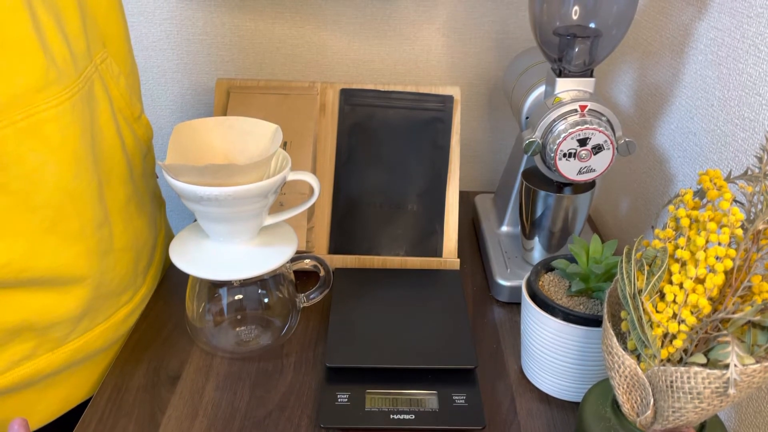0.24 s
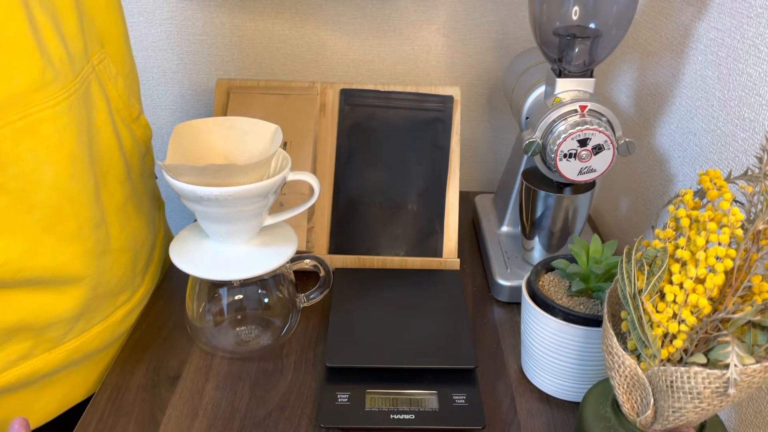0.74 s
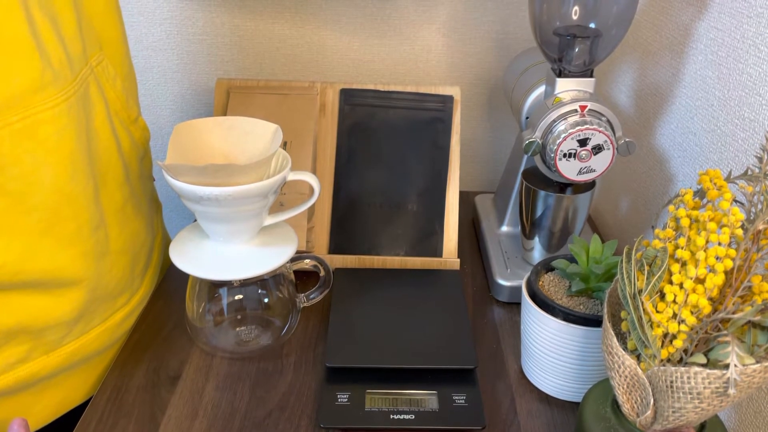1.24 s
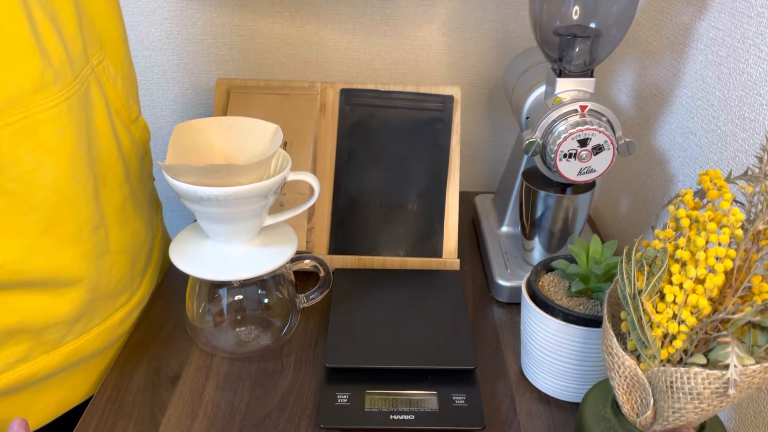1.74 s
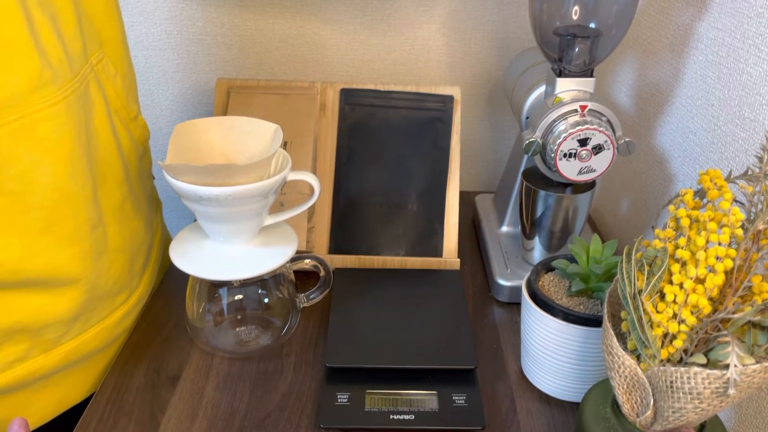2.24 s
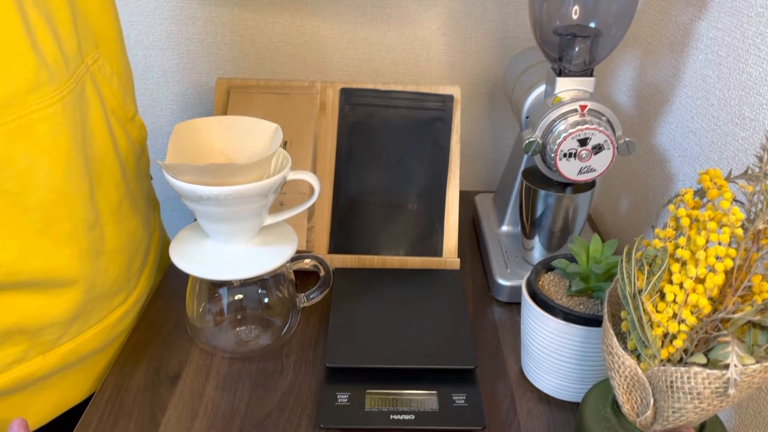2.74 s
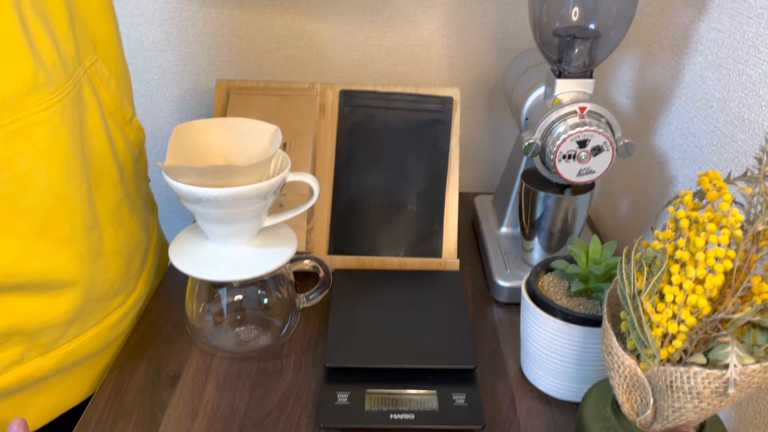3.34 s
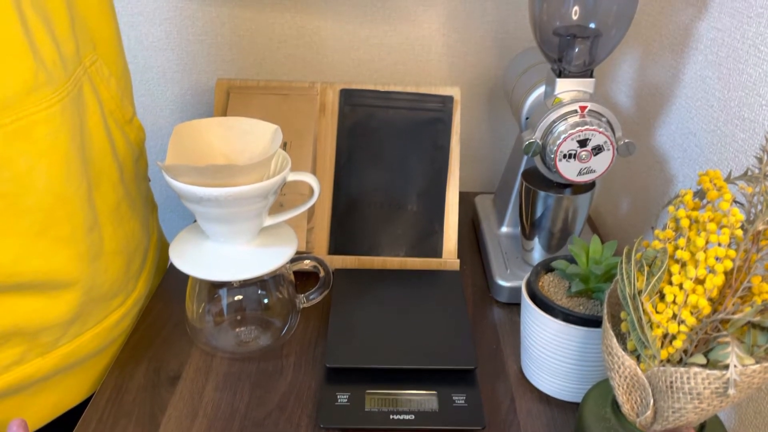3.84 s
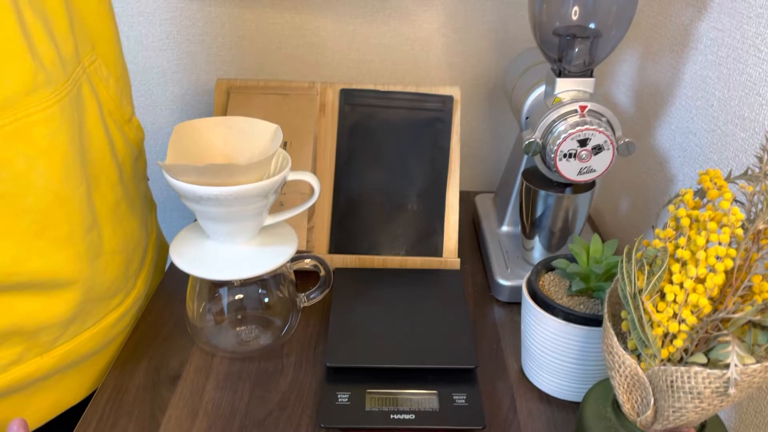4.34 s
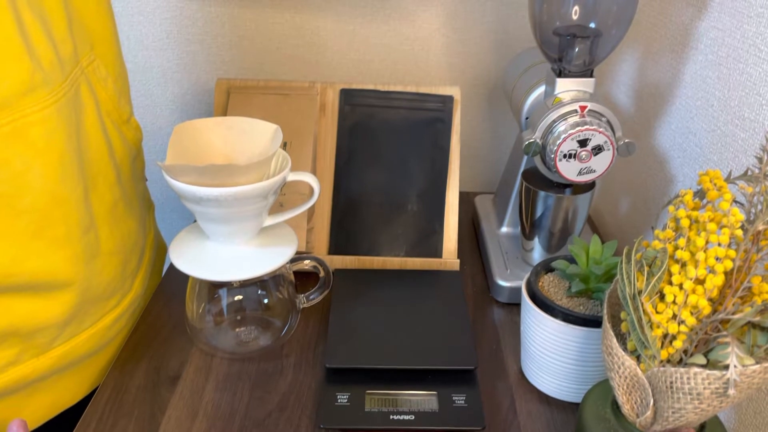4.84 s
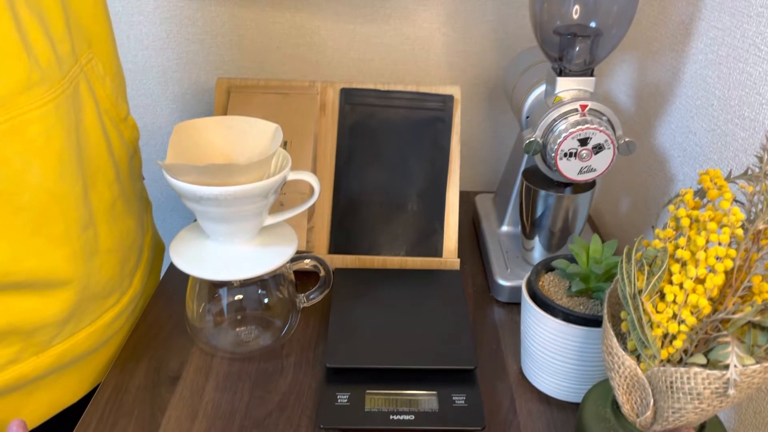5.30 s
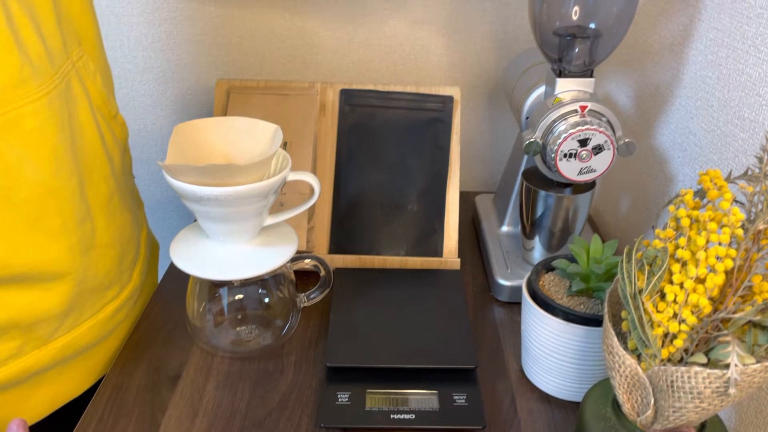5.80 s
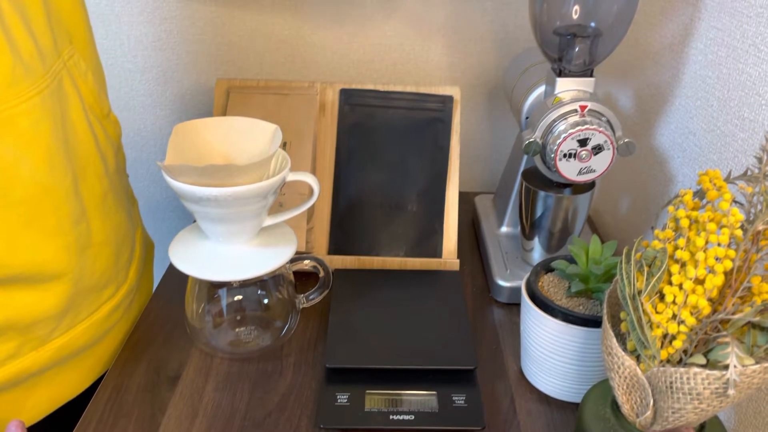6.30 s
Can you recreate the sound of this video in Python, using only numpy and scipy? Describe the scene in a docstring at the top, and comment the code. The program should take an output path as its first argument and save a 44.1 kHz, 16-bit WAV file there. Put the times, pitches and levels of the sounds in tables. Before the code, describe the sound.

An electric coffee grinder is already running on a wooden counter, heard close by. Beans crack and crunch in irregular clumps, rattling the housing and chute over a motor whine, low hum and airy hiss. The whine slowly climbs as the crunch thins, with a few soft thumps through the counter. For the last two seconds it runs nearly empty, with a steadier whine and a few stray cracks.

```python
"""An electric burr grinder on a wooden counter, already chewing through its last beans.
At first beans crack in clumps between the burrs, ringing the housing, chute and hopper and thumping
the counter, over motor whine, mains hum and the hiss of brushes and cooling air. As the load falls,
the whine climbs and the crunch thins. From about 4.5 s the grinder runs nearly empty: a steadier
whine, the same hiss and a few stray cracks."""
import sys
import numpy as np
from scipy import signal
from scipy.fft import rfft, irfft
from scipy.io import wavfile

SR = 44100
rng = np.random.default_rng(int(sys.argv[2]) if len(sys.argv) > 2 else 0)


def put_to_file(sound):
    """Save the sound as 16-bit audio at rate SR, in the file named by the first command-line argument."""
    columns = np.atleast_2d(sound).T  # one column per channel
    safe = np.clip(columns, -1, 1)
    whole_steps = np.round(safe * 32767)
    wavfile.write(sys.argv[1], SR, whole_steps.astype(np.int16))


N = 289296
T = np.arange(N) / SR
HZ = np.maximum(np.fft.rfftfreq(N, 1 / SR), 1)

# motor shaft speed: time_s, speed_hz
SHAFT_SPEED = [(0, 94.2), (.1, 94.25), (.18, 94.8), (.28, 94.35), (.36, 95.8), (.4, 95.25), (.46, 93.5),
               (.54, 92.35), (.62, 93.7), (.7, 94.1), (.82, 97.45), (.86, 97.8), (.98, 97.05), (1.08, 94.5),
               (1.14, 94.05), (1.38, 95.97), (1.54, 98.37), (1.62, 98.9), (1.7, 98.9), (1.87, 100.25),
               (2.08, 97.96), (2.4, 101.22), (2.54, 101.7), (2.72, 101.8), (2.88, 102.3), (3.1, 103.54),
               (3.2, 103.36), (3.44, 103.42), (3.7, 104.41), (3.92, 104.78), (4.12, 105.51), (4.7, 106.58),
               (5.04, 106.3), (5.72, 106.85), (6.56, 106.9)]
# six shaft speeds, from full load to running empty: speed_hz
LOAD_STAGES = [94.5, 99, 103, 105.2, 106.3, 106.9]
# partials of the whine: multiple of the shaft speed, then level_db at each load stage
SHAFT_ORDERS = [(1, -44.5, -46, -51, -50, -41.5, -39.5), (2, -55, -57, -62, -59, -60, -59),
                (9, -65, -65, -65, -65, -64, -50), (10, -60, -56, -52, -49, -50, -54),
                (11, -43, -44, -47, -47, -40.5, -40.5), (12, -55, -50, -55, -54, -51, -58),
                (13, -46, -54, -47, -46, -41, -42), (14, -39.5, -42, -42, -45.5, -48.5, -59),
                (15, -46, -43.5, -45, -47, -59, -52), (16, -39.5, -37.5, -50, -50, -39, -42),
                (17, -56, -55, -57, -49, -48.5, -57), (18, -52, -51, -50, -54, -58, -58),
                (19, -48, -51, -55, -58, -60, -60), (20, -65, -65, -65, -60, -56, -49),
                (22, -44, -50, -54, -60, -64, -57), (24, -50, -53, -57, -62, -66, -66),
                (25, -48, -56, -54, -59, -57, -51), (26, -56, -46, -56, -58, -49, -52),
                (27, -58, -53, -57, -65, -63, -55), (28, -54, -56, -54, -53, -57, -60),
                (30, -48, -47, -60, -53, -51, -53), (31, -46, -43.5, -43, -46, -56, -57),
                (32, -60, -51, -51, -56, -61, -59), (33, -55, -56, -63, -65, -58, -57),
                (34, -51, -54, -55, -60, -55, -52), (41, -64, -61, -56, -56, -57, -60),
                (43, -65, -61, -61, -64, -63, -56), (45, -51, -48, -55, -51.5, -54, -57),
                (46, -62, -62, -49, -53, -50, -49), (47, -59, -68, -66, -68, -51, -48.5),
                (48, -60, -53, -57, -52, -51, -52), (49, -63, -59, -53, -56, -56, -57),
                (50, -68, -59, -55, -56, -57, -55), (56, -65, -68, -56, -54, -52, -54),
                (57, -68, -68, -63, -55, -58, -61), (60, -64, -56, -59, -54, -55, -57),
                (61, -55, -58, -55, -57, -58, -61)]
# modes that lift any partial gliding through them: pitch_hz, width_hz, lift_db
SINGING_MODES = [(1480, 24, 12), (4755, 45, 8.5)]
# magnetic hum: pitch_hz, level_db
MAINS_HUM = [(120, -41.5), (240, -58), (360, -58), (480, -56), (1203, -54)]

# grinding bed as the beans run out: time_s, crunch_db, high_shell_db, chute_db, thud_db, rumble_db
GRINDING_BED = [(0, -28, -26.5, -30, -44, -52), (.5, -28, -28, -29.5, -41.5, -49),
                (1, -28.5, -28, -31.5, -47, -53), (1.5, -30, -28, -30, -39.5, -48),
                (2.1, -29, -27.5, -33, -45, -56), (2.5, -31.5, -29, -33.5, -40.5, -48),
                (3.1, -33.5, -29.5, -32.5, -40.5, -44), (3.6, -35.5, -31.5, -34, -42.5, -43),
                (4.1, -40, -36, -35.5, -44.5, -45), (4.35, -44.5, -38, -40.5, -44.5, -49),
                (4.6, -48, -41, -46, -54, -56), (5.6, -50, -42, -41, -52, -56),
                (6.56, -47, -44, -40, -54, -51)]
# how far the churn swings that bed: crunch_db, high_shell_db, chute_db, thud_db, rumble_db
CHURN_DEPTHS = [0.49, 2.2, 1.4, 1.3, 0.84]
# whole beans breaking: start_s, crack_db, low_shell_db, chute_db, hopper_db, high_shell_db, thud_db
BEAN_CRACKS = [(0.0134, -19, -31, -21, -27, -38, -39), (0.0566, -15, -28, -18, -28, -24, -37),
               (0.093, -13, -28, -23, -32, -22, -30), (0.1459, -16, -28.5, -25, -23, -28, -40),
               (0.2125, -10, -30, -24, -21, -22, -40), (0.3018, -20, -33, -35, -28, -31, -42),
               (0.3409, -21, -28, -29, -33, -33, -40), (0.3843, -8, -28, -23, -29, -20, -36),
               (0.4115, -14, -27, -30, -30, -25, -39), (0.4905, -9, -23.5, -22, -30, -27, -37),
               (0.5364, -4, -26, -35, -26, -17, -37), (0.6092, -17, -33, -38, -29, -25, -39),
               (0.6664, -5, -22.5, -30, -23, -30, -47), (0.7307, -13, -34, -30, -22, -27, -38),
               (0.7754, -20, -30, -31, -24, -32, -43), (0.8185, -24, -29, -32, -36, -32, -45),
               (0.8591, -19, -24.5, -31, -26, -28, -35), (0.9292, -21, -30, -38, -33, -27, -40),
               (1.0141, -6, -25, -24.5, -27, -29, -42), (1.0404, -9, -29.5, -27, -25, -23, -42),
               (1.074, -9, -31, -26, -25, -26, -45), (1.1134, -5, -28, -27, -24, -36, -43),
               (1.1438, -19, -25, -28, -36, -34, -40), (1.2396, -17, -30, -35, -27, -29, -33),
               (1.2907, -20, -32, -21, -30, -35, -42), (1.3264, -10, -30, -29, -18, -24, -43),
               (1.3894, -17, -29, -24, -32, -30, -39), (1.467, -15, -31, -26, -28, -31, -40),
               (1.5167, -22, -25.5, -39, -33, -31, -40), (1.5647, -14, -31.5, -24, -27, -26, -44),
               (1.6147, -20, -27, -40, -28, -28, -39), (1.675, -13, -28, -18, -19, -30, -31),
               (1.7067, -21, -32, -30, -27, -32, -40), (1.7594, -21, -30, -29, -33, -35, -43),
               (1.8391, -15, -32, -31, -33, -33, -38), (1.8946, -13, -34, -26, -27, -27, -45),
               (1.9127, -5, -28, -24.5, -25, -24, -41), (1.946, -12, -30, -23, -25, -27, -45),
               (1.9804, -15, -24, -31, -28, -29, -42), (2.0283, -11, -35, -22.5, -22, -22, -39),
               (2.0714, -13, -28, -24, -33, -20.5, -40), (2.1375, -19, -29, -31, -27, -26, -40),
               (2.1999, -14, -25, -31, -26, -22, -41), (2.249, -18, -31, -31, -30, -27, -39),
               (2.347, -9, -34, -30, -24, -28, -31), (2.3842, -19, -22.5, -30, -33, -29, -39),
               (2.4922, -18, -27.5, -35, -38, -31, -35), (2.5524, -21, -42, -34, -36, -26, -39),
               (2.6154, -17, -32, -30, -34, -22.5, -39), (2.7199, -7, -21.5, -29, -29, -24, -34),
               (2.797, -9, -27, -28, -40, -35, -40), (2.8634, -17, -31, -33, -38, -24.5, -40),
               (2.9136, -24, -33, -37, -35, -34, -34), (2.9846, -20, -34, -26, -33, -28, -38),
               (3.0649, -23, -34, -35, -38, -38, -44), (3.1173, -18, -37, -40, -35, -24, -34),
               (3.1514, -5, -31.5, -20.5, -28, -21.5, -30), (3.2958, -13, -33, -29, -32, -23.5, -30),
               (3.3293, -20, -28, -30, -32, -34, -31), (3.3844, -9, -30, -35, -33, -24, -26),
               (3.4744, -20, -31, -36, -34, -29, -41), (3.5804, -22, -35, -27, -37, -33, -40),
               (3.6463, -19, -30.5, -33, -36, -34, -36), (3.7346, -22, -31, -30, -38, -31, -40),
               (3.7793, -7, -32, -26, -35, -24, -39), (3.9125, -12, -29, -35, -35, -28, -37),
               (3.9903, -21, -31.5, -41, -33, -36, -37), (4.079, -26, -41, -35, -39, -35, -40),
               (4.115, -20, -41, -36, -38, -35, -31), (4.1889, -25, -35, -37, -43, -36, -45),
               (4.339, -26, -42, -36, -33, -32, -40), (4.3884, -24, -49, -35, -38, -33, -42),
               (4.5289, -25, -39, -36, -41, -39, -48), (4.972, -22, -41, -42, -37, -38, -50),
               (5.0192, -17, -41, -37, -40, -38, -47), (5.2694, -29, -43, -33, -36, -41, -50),
               (5.5737, -25, -42, -35, -37, -40, -48), (5.6964, -33, -45, -35, -40, -40, -50),
               (5.7494, -31, -47, -37, -41, -40, -53), (5.9794, -33, -49, -37, -45, -41, -53),
               (5.9956, -29, -47, -28.5, -37, -37, -46), (6.0294, -31, -47, -33, -40, -40, -47),
               (6.156, -29, -43, -38, -42, -44, -49)]
# boost on each bean's blow to a part: low_shell_db, chute_db, hopper_db, high_shell_db
STRIKE_BOOSTS = [50, 51.5, 52, 49]
# tone of the grit: frequency_hz, gain_db
GRIT_EQ = [(60, -20), (200, -20), (500, -4.5), (850, -13.5), (1300, -3), (2000, -4), (2600, -11),
           (4000, -15.5), (7500, -51), (16000, -53)]
# tone of the finest dust: frequency_hz, gain_db
DUST_EQ = [(1500, -30), (2800, -3), (4000, -8), (5500, -5), (7500, 4.5), (11000, 0), (16000, -9.5)]
# ring of the shell (housing, hopper and cup): pitch_hz, width_hz, gain_db
SHELL_MODES = [(354.7, 26, -3.5), (499, 24, 2.5), (566, 38, -3.5), (688.4, 38, -6.5), (1484, 35, -7),
               (2067, 40, -2.5), (2260, 35, -4), (2626, 46, -15.5), (2894, 77, -12.5), (3156, 110, -14.5),
               (5300, 50, -37)]
# ring of the chute: pitch_hz, width_hz, gain_db
CHUTE_MODES = [(1040, 18.4, 1.5), (1058, 20.8, 0.5), (951, 40, -13.5)]
# hopper rattle, fading as it empties: time_s, level_db
HOPPER_FADE = [(0.0, -32.5), (0.56, -30), (0.89, -32.5), (1.75, -32), (2.98, -44.5), (3.29, -42),
               (3.6, -47), (4.62, -45.5), (6.56, -52)]

# tone of the brushes and cooling air: frequency_hz, gain_db
HISS_EQ = [(22, -40), (60, -1), (150, -9), (800, -6), (940, -6.5), (1050, 1.5), (1500, -0.5), (1950, -5.5),
           (2500, -1), (3200, 2), (4100, -4), (4500, -5), (4900, 2), (5550, -8), (6000, 0.5), (6800, 0.5),
           (7400, -1.5), (8300, -2.5), (10500, -8), (12300, -11), (13500, -6), (15800, -23.5)]
# the machine jolts on the counter: peak_s, rumble_db
COUNTER_JOLTS = [(0.901, -42.0), (1.434, -41), (2.561, -44), (2.991, -41), (3.18, -38), (3.407, -46),
                 (3.71, -43), (3.948, -33), (4.117, -40), (4.386, -41)]
# how alike left and right sound: frequency_hz, likeness (0 to 1)
STEREO_LIKENESS = [(60, 1), (290, 0.95), (420, 0.87), (640, 0.43), (1410, 0.69), (2200, 0.38), (3100, 0.46),
                   (6800, 0.75), (8500, 1), (15000, 0.95)]
# how far left leads right in phase: frequency_hz, lead_rad
STEREO_LEAD = [(0, 0), (690, -.7), (1810, -.4), (3270, -1.4), (4310, -.5), (7000, 0), (7800, 3),
               (8900, 3.3), (10000, 6), (11800, 6.5), (12500, 9.3), (13800, 9.6), (14600, 12.4),
               (15900, 12.6)]
# left level over right: frequency_hz, balance_db
STEREO_BALANCE = [(60, 2), (110, 2), (200, -1.5), (380, -0.5), (700, -5.5), (1290, -1), (2380, -2.5),
                  (4400, -4), (8120, 1), (15000, -0.5)]

CRACK_RISE_S, CRACK_FALL_S = .006, .0083
GEAR_RATIO = 16   # motor turns per burr turn


def motor_whine(speed, turns, level_db, waver_db, rough_db, phase_jitter, throb):
    """Shaft orders sing through the housing, their levels following the load, over steady mains hum."""
    waver, rough = drift(2.4, count=6), drift(27, count=6)
    rough *= np.interp(speed, LOAD_STAGES[2::3], [1, .4])   # steadier as the load falls
    burr_throb = 1 + throb * np.cos(2 * np.pi * turns / GEAR_RATIO)   # load swings once per burr turn
    tones = np.zeros(N)
    for k, (order, *stage_db) in enumerate(SHAFT_ORDERS):
        db = level_db + np.interp(speed[::64], LOAD_STAGES, stage_db)
        for hz, width_hz, lift_db in SINGING_MODES:
            db += lift_db / (1 + ((order * speed[::64] - hz) / width_hz) ** 2)
        # high orders are rougher: their level flutters and their phase wanders more
        db += np.tanh(order / 10) * (waver_db * waver[k % 6, ::64] + rough_db * rough[k % 6, ::64])
        phase = 2 * np.pi * (order * turns + rng.random()) + phase_jitter * order * rough[(k + 3) % 6]
        envelope = np.interp(T, T[::64], from_db(db))
        tones += envelope * np.sin(phase) * (burr_throb if order > 1 else 1)
    for hz, db in MAINS_HUM:
        tones += from_db(db) * np.sin(2 * np.pi * (hz * T + rng.random()))
    scattered = irfft(1j * rfft(tones), N)   # the same tones a quarter cycle apart
    return np.sqrt(2) * np.array([tones, scattered])


def bean_blows(levels_db):
    """One click per broken bean; the scattered path gets it up to 4 ms later."""
    start_s = np.array(BEAN_CRACKS)[:, 0]
    near_sign, scattered_sign, lag = rng.random((len(start_s), 3)).T
    late_s = start_s + .004 * lag
    clicks = np.zeros((2, N))
    clicks[0, (start_s * SR).astype(int)] = from_db(levels_db) * np.sign(near_sign - .5)
    clicks[1, (late_s * SR).astype(int)] = from_db(levels_db) * np.sign(scattered_sign - .5)
    return clicks


def crack_swells(bed_db, cracks_db):
    """Each breaking bean pushes a layer's level up for an instant."""
    peak_s = np.array(BEAN_CRACKS)[:, 0] + CRACK_RISE_S
    return with_swells(bed_db, peak_s, cracks_db, CRACK_RISE_S, CRACK_FALL_S)


def crunch(level_db, eq, per_s, clump_db, wash_db):
    """Bean pieces snap between the burrs in random clumps."""
    snaps = patter(per_s, spread_db=3, wash_db=wash_db)
    clumps = from_db(clump_db * drift(45))
    return from_db(level_db) * coloured(snaps * clumps, eq)


def shell_ring(low_db, high_db, low_blows, high_blows, drive_db, split_hz):
    """Small pieces knock the shell all the time; whole beans strike it singly."""
    low, high = from_db(low_db + drive_db), from_db(high_db + drive_db)
    knocks = [patter(per_s=320, spread_db=1.5, wash_db=-1.5) for _ in range(4)]
    shell = np.zeros((2, N))
    for k, (hz, width_hz, db) in enumerate(SHELL_MODES):
        level, blows = (low, low_blows) if hz < split_hz else (high, high_blows)
        shell += from_db(db) * (-1) ** k * ring(knocks[k % 4] * level, blows, hz, width_hz)
    return shell


def chute_rattle(level_db, blows, drive_db):
    """Loose pieces tumble through the hollow chute and ring it; whole beans strike it singly."""
    knocks = from_db(level_db + drive_db) * patter(per_s=600, spread_db=1, wash_db=-3)
    return sum(from_db(db) * ring(knocks, blows, hz, width_hz) for hz, width_hz, db in CHUTE_MODES)


def hopper_rattle(blows, drive_db):
    """Tumbling beans ring one note of the hopper, fading as it empties."""
    level_db, = in_time(HOPPER_FADE)
    knocks = from_db(level_db + drive_db) * patter(per_s=400, spread_db=.5, wash_db=-4)
    return ring(knocks, blows, hz=1808, width_hz=37)


def brush_hiss(turns, level_db, flutter_db):
    """Brushes and cooling air hiss, pulsing with the turns of the shaft."""
    beats = [(1 / GEAR_RATIO, .03), (2, .1), (3, .12), (5, .08)]
    pulse = 1 + sum(depth * np.cos(2 * np.pi * order * turns) for order, depth in beats)
    noise = rng.standard_normal((2, N)) * pulse * from_db(flutter_db * drift(23))
    return from_db(level_db) * coloured(noise, HISS_EQ)


def counter_shake(level_db, low_hz, high_hz):
    """The counter shakes under the machine: a band of low noise."""
    band = signal.butter(2, [low_hz, high_hz], "band", fs=SR, output="sos")
    return from_db(level_db) * unit_rms(signal.sosfilt(band, rng.standard_normal((2, N))))


def stereo_image(near, scattered):
    """Left hears the near path; right hears it shifted in phase and blended with the scattered path."""
    likeness = np.clip(at_hz(STEREO_LIKENESS), 0, 1)
    tilt = from_db(at_hz(STEREO_BALANCE) / 2)
    lead_rad = np.interp(HZ, *np.transpose(STEREO_LEAD))
    left = rfft(near)
    right = likeness * left * np.exp(-1j * lead_rad) + np.sqrt(1 - likeness ** 2) * rfft(scattered)
    return irfft(np.array([left * tilt, right / tilt]), N)


def patter(per_s, spread_db, wash_db):
    """Random clicks of uneven size, at the same moments on both paths, over a wash of noise."""
    sizes = from_db(spread_db * np.minimum(rng.exponential(1, N), 5))
    hits = rng.random(N) < per_s / SR
    clicks = unit_rms(sizes * hits) * rng.choice([-1, 1], (2, N))
    return clicks + from_db(wash_db) * rng.standard_normal((2, N))


def ring(knocks, blows, hz, width_hz):
    """A mode rung by knocks and blows; a wider resonance cushions each blow, so its ring swells in."""
    cushioned = resonate(blows + 1e-18, hz, 1.96 * width_hz)
    return resonate(knocks + cushioned, hz, width_hz)


def resonate(x, hz, width_hz):
    """One mode, gain 1 at its peak."""
    r = np.exp(-np.pi * width_hz / SR)
    feedback = [1, -2 * r * np.cos(2 * np.pi * hz / SR), r * r]
    return signal.lfilter((1 - r * r) / 2 * np.array([1, 0, -1]), feedback, x)


def with_swells(bed_db, peak_s, peak_db, rise_s, fall_s):
    """A level curve in dB plus short swells; their powers add."""
    offset_s = T[::64, None] - peak_s
    swells = np.exp(-.5 * (offset_s / np.where(offset_s < 0, rise_s, fall_s)) ** 2)
    swell_power = np.interp(T, T[::64], swells @ from_db(peak_db) ** 2)
    return 10 * np.log10(from_db(bed_db) ** 2 + swell_power)


def drift(rate_hz, count=1):
    """Smooth random modulation curves of rms 1, rolling off above rate_hz."""
    step = 40   # samples per control point
    r = np.exp(-2 * np.pi * step * rate_hz / SR)
    noise = rng.standard_normal((count, N // step + 2002))
    curves = signal.lfilter([1], [1, -2 * r, r * r], noise)[:, 2000:]
    return np.array([np.interp(np.arange(N) / step, np.arange(len(c)), unit_rms(c)) for c in curves])


def coloured(x, eq):
    """Shape a signal with an EQ curve; rms 1."""
    return unit_rms(irfft(rfft(x) * from_db(at_hz(eq)), N))


def at_hz(points):
    """A frequency curve at every FFT bin."""
    hz, value = np.transpose(points)
    return np.interp(np.log(HZ), np.log(np.maximum(hz, 1)), value)


def in_time(rows):
    """Each column of an automation table at every sample."""
    time_s, *columns = np.transpose(rows)
    return [np.interp(T, time_s, column) for column in columns]


def unit_rms(x):
    """Scale to rms 1."""
    return x / np.sqrt(np.mean(x ** 2) + 1e-20)


def from_db(db):
    """Decibels to gain."""
    return 10 ** (np.asarray(db) / 20)


def scene():
    """Motor, beans, hiss and counter, mixed on a near and a scattered path, then spread to stereo."""
    speed, = in_time(SHAFT_SPEED)
    turns = np.cumsum(speed) / SR
    bed_db = np.array(in_time(GRINDING_BED))
    # the stream of small pieces thickens and thins
    churn_db = np.array(CHURN_DEPTHS)[:, None] * drift(15.5, count=5)
    crunch_db, high_shell_db, chute_db, thud_db, rumble_db = bed_db + churn_db
    _, crack_db, *strikes_db, crack_thud_db = np.transpose(BEAN_CRACKS)
    low_blows, chute_blows, hopper_blows, high_blows = [
        bean_blows(db + boost_db) for db, boost_db in zip(strikes_db, STRIKE_BOOSTS)]
    grit_db = .59 * crack_swells(crunch_db, crack_db - 17.5) - 11.5   # swings less than the crunch
    dust_db = .65 * bed_db[0] - 17   # follows the steady grinding, not the single cracks
    thud_db = crack_swells(thud_db, crack_thud_db - 4)
    rumble_db = with_swells(rumble_db, *np.transpose(COUNTER_JOLTS), rise_s=.016, fall_s=.012)

    mix = motor_whine(speed, turns, level_db=.5, waver_db=1.5, rough_db=1.4, phase_jitter=.004, throb=.1)
    mix += crunch(grit_db, GRIT_EQ, per_s=7000, clump_db=2, wash_db=-3.5)
    mix += crunch(dust_db, DUST_EQ, per_s=5000, clump_db=2.5, wash_db=1)
    mix += shell_ring(crunch_db, high_shell_db, low_blows, high_blows, drive_db=18, split_hz=900)
    mix += chute_rattle(chute_db, chute_blows, drive_db=19.5)
    mix += hopper_rattle(hopper_blows, drive_db=25)
    mix += brush_hiss(turns, level_db=-32.5, flutter_db=.3)
    mix += counter_shake(thud_db, low_hz=155, high_hz=292)
    mix += counter_shake(rumble_db, low_hz=56.6, high_hz=91)
    return stereo_image(*mix)


def record(dry):
    """A steep high cut takes off the very top."""
    cutoff_hz = 15740
    return signal.sosfilt(signal.ellip(12, .5, 60, cutoff_hz, fs=SR, output="sos"), dry)


dry = scene()
out = record(dry)
put_to_file(out)
```